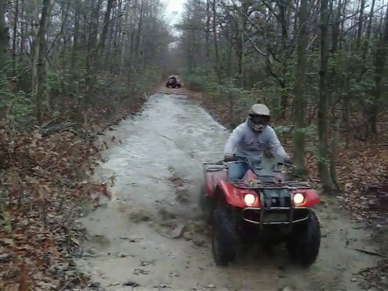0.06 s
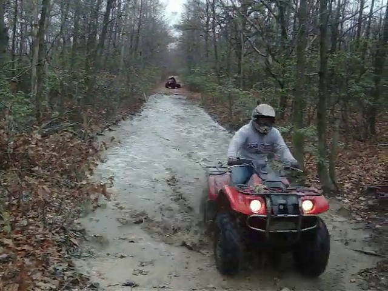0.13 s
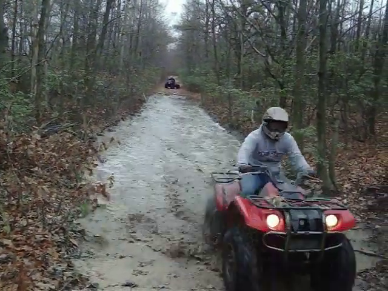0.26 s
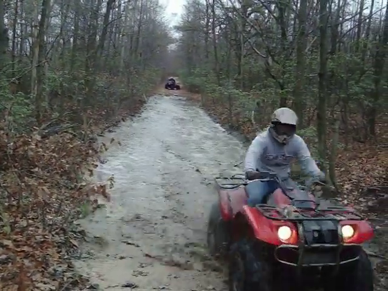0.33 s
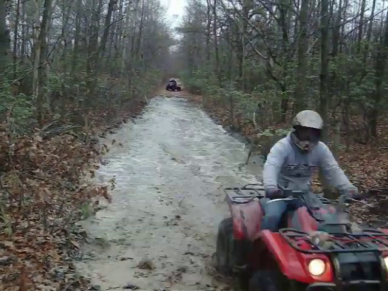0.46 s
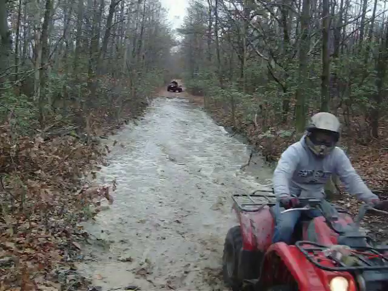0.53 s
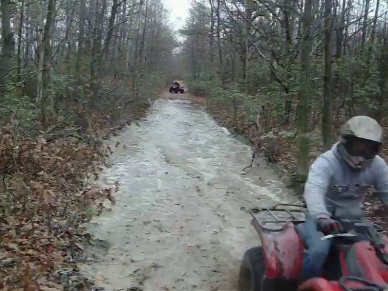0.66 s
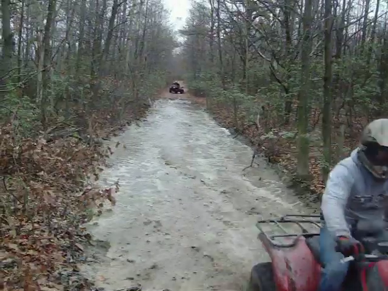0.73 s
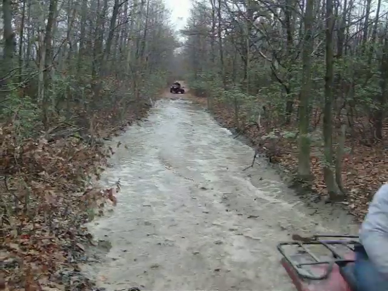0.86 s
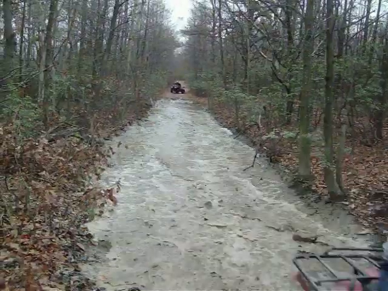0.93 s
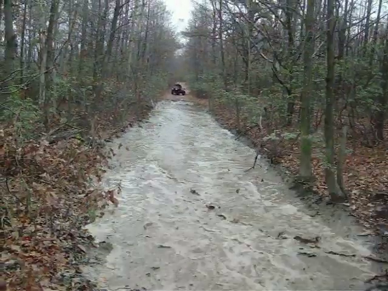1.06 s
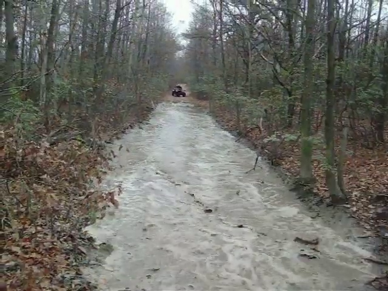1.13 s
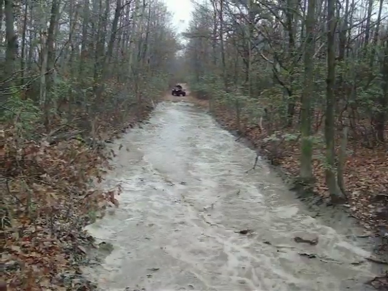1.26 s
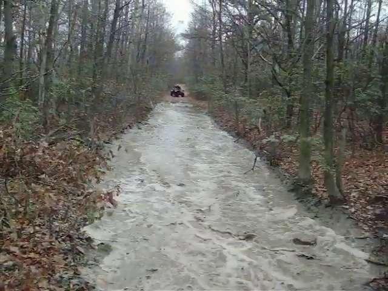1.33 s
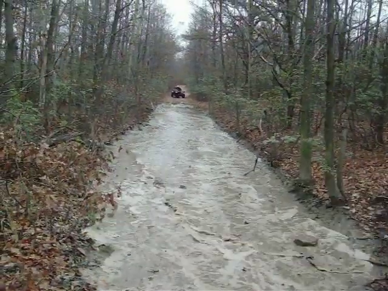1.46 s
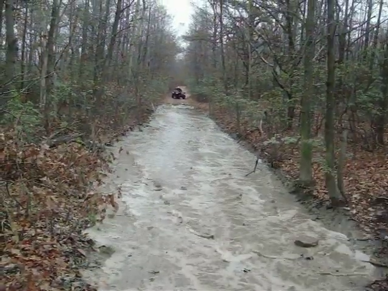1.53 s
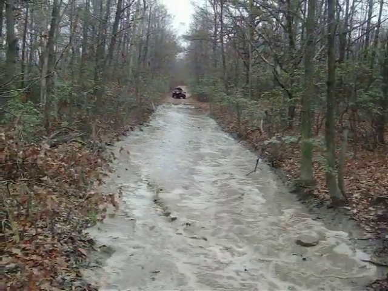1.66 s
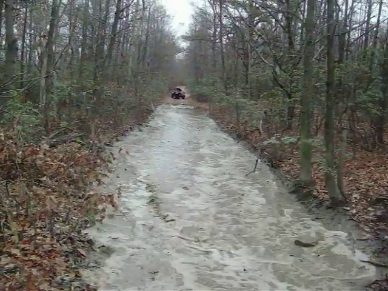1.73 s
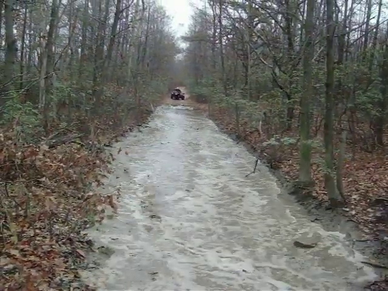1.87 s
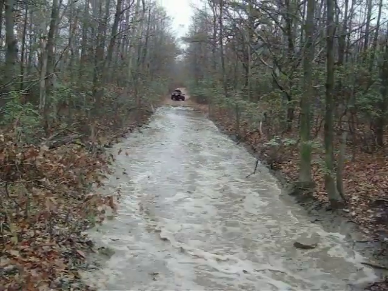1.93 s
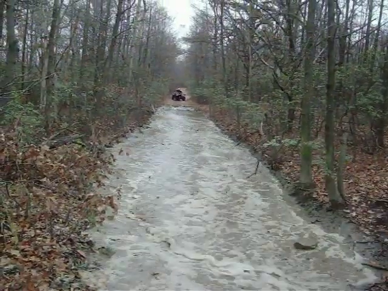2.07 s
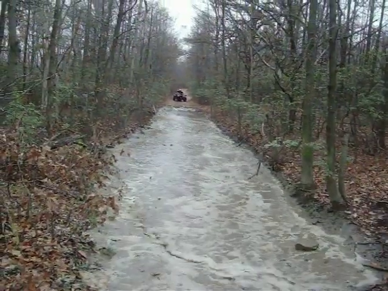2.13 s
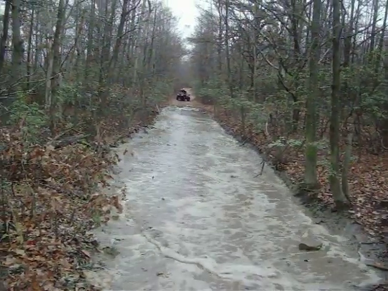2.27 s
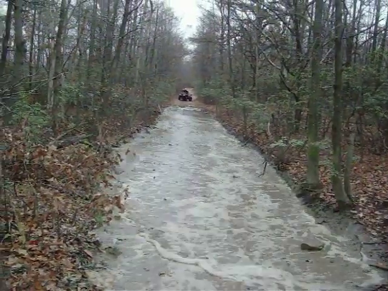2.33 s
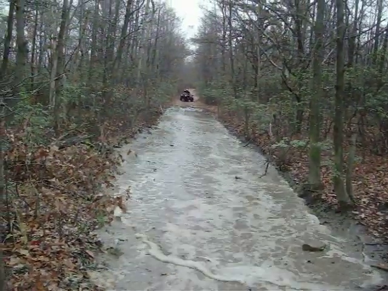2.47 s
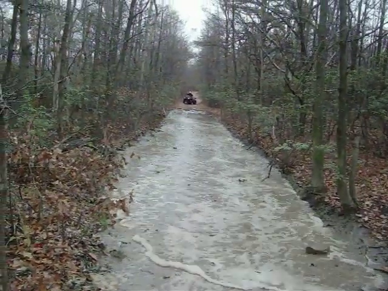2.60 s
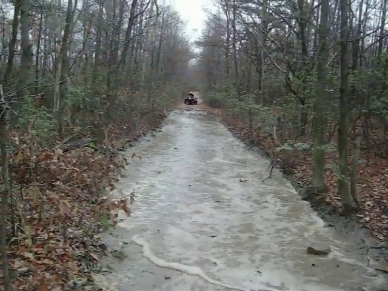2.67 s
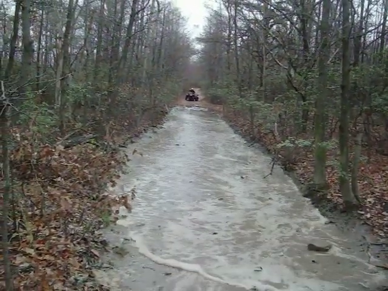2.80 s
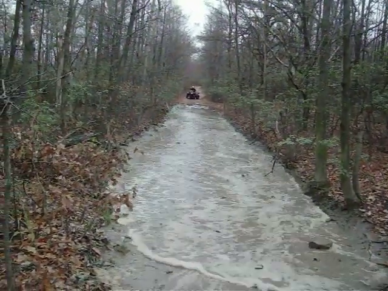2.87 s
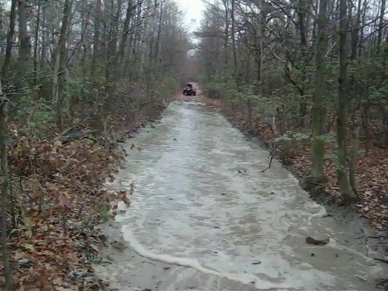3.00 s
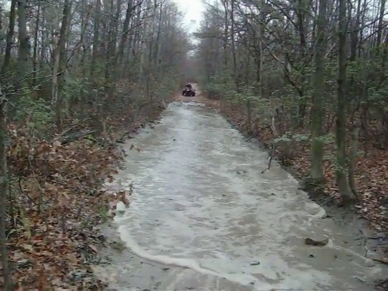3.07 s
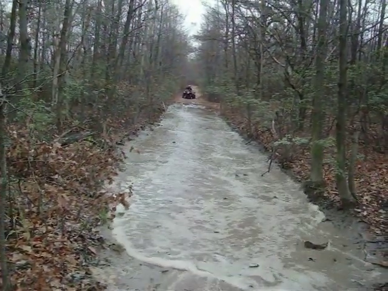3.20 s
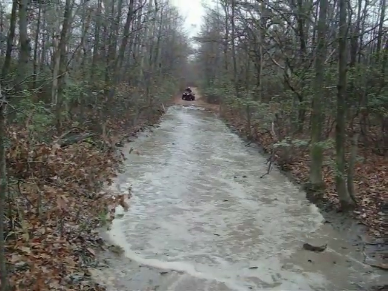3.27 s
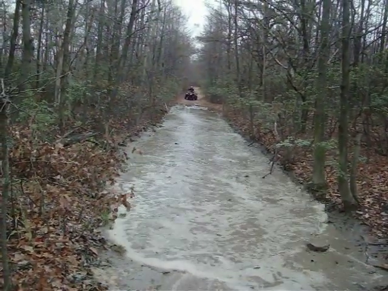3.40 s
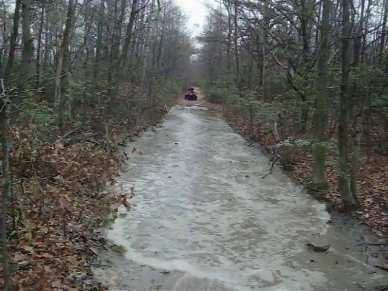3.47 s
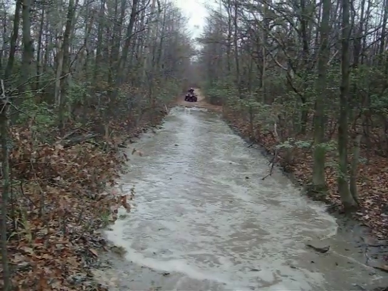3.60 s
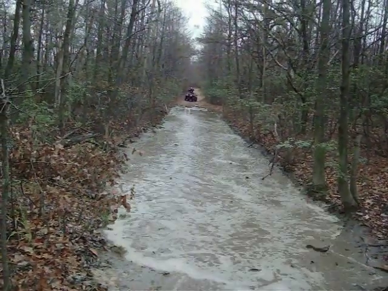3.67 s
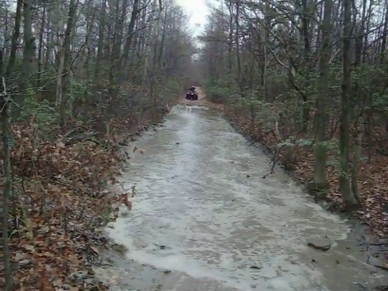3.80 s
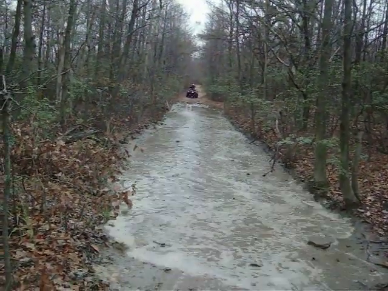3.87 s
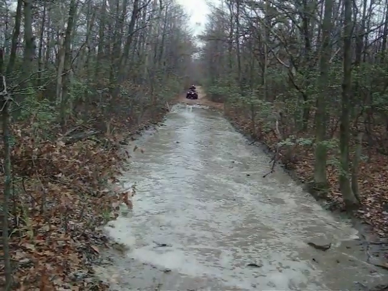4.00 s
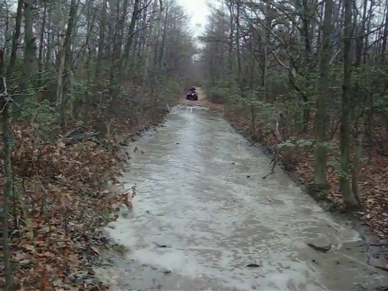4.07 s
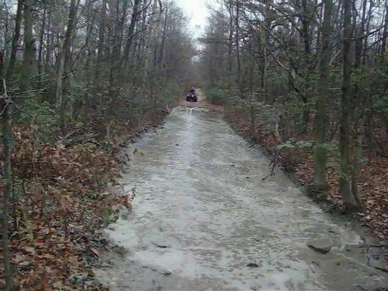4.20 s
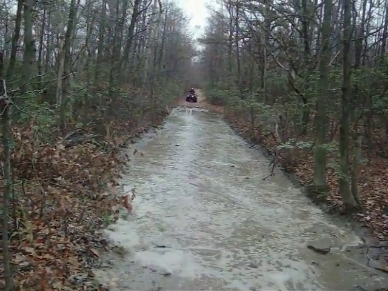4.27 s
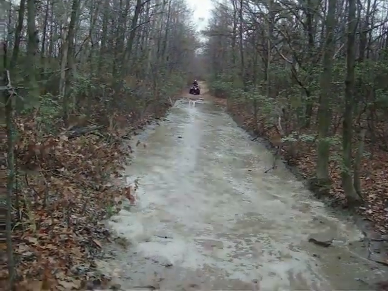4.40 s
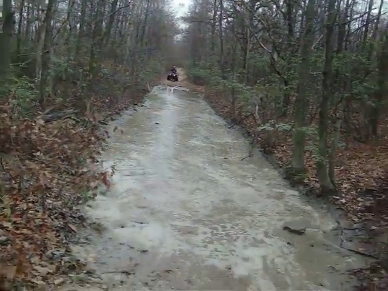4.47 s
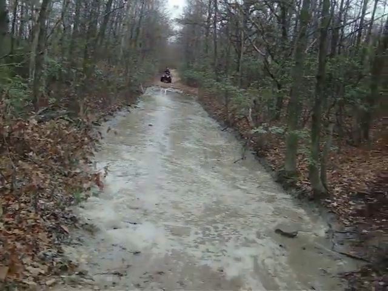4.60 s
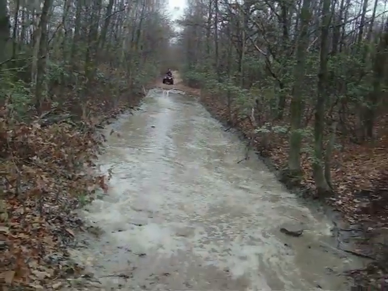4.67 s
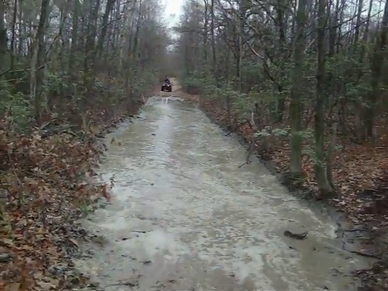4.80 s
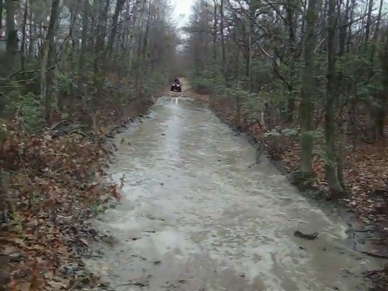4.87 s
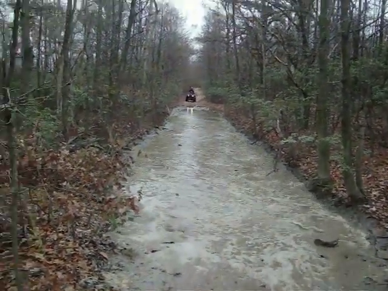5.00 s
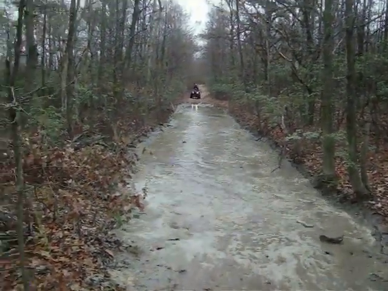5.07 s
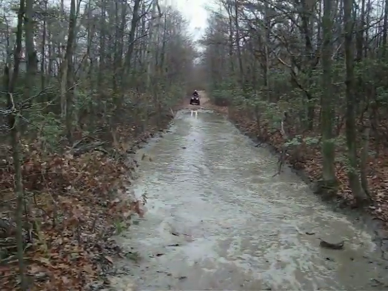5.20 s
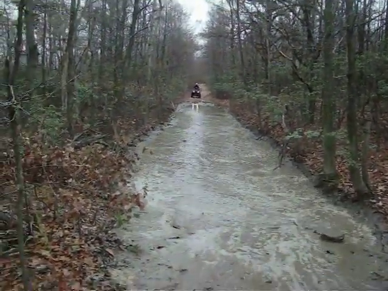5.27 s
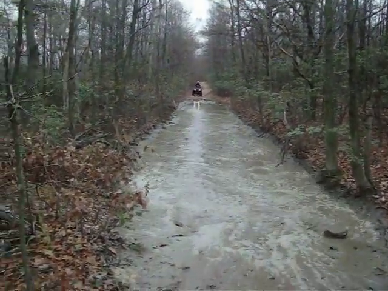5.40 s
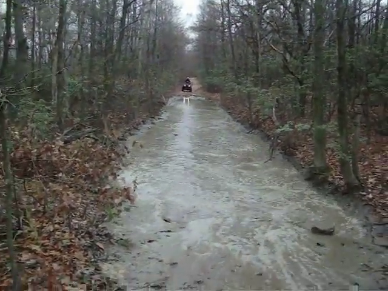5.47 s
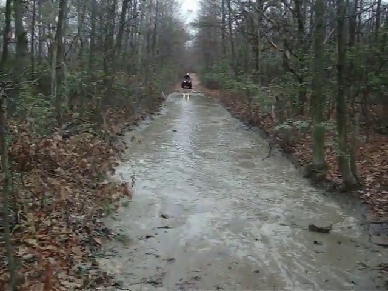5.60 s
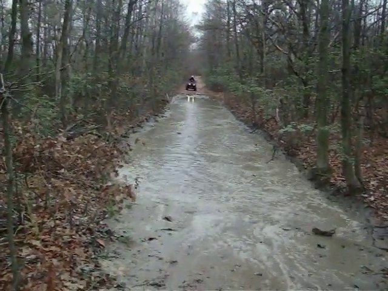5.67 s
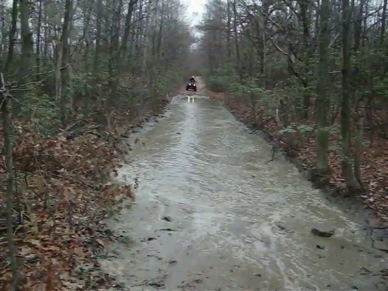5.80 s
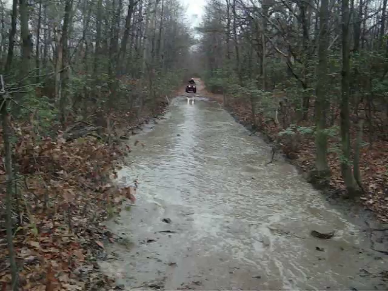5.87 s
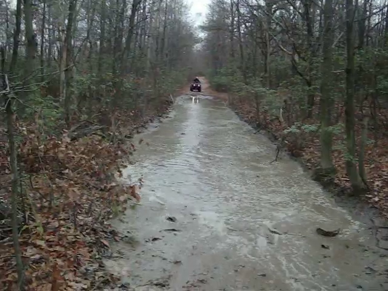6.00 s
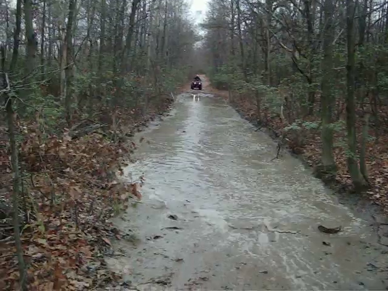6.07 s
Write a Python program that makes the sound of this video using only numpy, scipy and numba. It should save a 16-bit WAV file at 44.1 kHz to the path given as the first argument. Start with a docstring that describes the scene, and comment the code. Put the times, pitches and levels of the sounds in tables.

```python
"""On a flooded woodland track, a one-cylinder quad bike climbs out, passes close by, slows and idles.
Each firing sends a puff of gas down the exhaust, which thumps, barks and roars; valves, chain and
spray clatter along. A far engine hums behind it. The hand on the recorder rustles and taps, and each
hard tap makes the automatic gain (a self-adjusting volume) drop and creep back."""
import sys
import numpy as np
from scipy import signal
from scipy.fft import rfft, irfft, next_fast_len
from scipy.io import wavfile
from scipy.ndimage import uniform_filter1d
from numba import njit

SR = 44100
rng = np.random.default_rng(int(sys.argv[2]) if len(sys.argv) > 2 else 0)


def log_audio(samples):
    """Write samples as a 16-bit WAV file to the path given in sys.argv[1]."""
    # one column per channel
    frames = np.atleast_2d(samples).T
    # limit to full scale, then quantise
    limited = np.clip(frames, -1, 1)
    pcm = np.round(limited * 32767).astype(np.int16)
    wavfile.write(sys.argv[1], SR, pcm)


N = 270774
TIME = np.arange(N) / SR

# engine speed: t/s, firings per second/Hz
FIRING_RATE = [(0.0, 33.74), (0.43, 34.13), (0.93, 28.65), (1.02, 30.24), (1.63, 23.34), (2.1, 20.78),
               (2.75, 17.42), (3.15, 15.71), (3.32, 13.99), (3.57, 12.73), (4.5, 12.89), (4.55, 12.1),
               (5.01, 11.59), (5.24, 12.48), (6.2, 12.23)]
# firings that stand out, weak or strong: t/s, level/dB
ODD_FIRINGS = [(1.018, 0.5), (1.118, -1.5), (1.26, -6), (1.296, 1), (1.528, -3.5), (1.611, 4.5), (1.742, 4),
               (2.311, 5), (2.861, -2.5), (3.297, -7.5), (4.296, -12.5), (4.531, -11), (5.526, -3.5)]
# notes at which the pipe and silencer ring: f/Hz, relative level/dB, time to fade by 60 dB/s
PIPE_NOTES = [(66, 0, .126), (104, 13.7, .103), (134, 7, .141), (217, 15.9, .087), (218, 19.3, .058),
              (332, 8, .193), (378, 13.3, .068), (544, 17.9, .186), (582, 15.2, .112)]
# the tailpipe swings towards the microphone, then the idle softens: t/s, level/dB
TAILPIPE_LEVEL = [(1.9, -57), (2.4, -23), (2.95, -10), (4.0, -7.5), (5.3, -10.5), (6.1, -16)]
# parts of the hard-working engine: t/s, note level/dB, low bark level/dB, high bark level/dB, roar level/dB
PASS_LEVELS = [(0, -20, -27, -18, -14), (.5, -15.5, -25.5, -15.5, -13.5), (.9, -17.5, -14, -15.5, -14),
               (1.03, -26.5, -19.5, -20, -16.5), (1.15, -22, -17.5, -15, -18),
               (1.5, -27.5, -11.5, -13.5, -18), (1.9, -33.5, -10, -18, -28), (2.3, -20, -13, -24, -25),
               (2.6, -21.5, -19, -35, -30), (2.95, -36, -23, -31, -40), (3.2, -56.5, -49, -66, -60)]
# tones in the engine's note: multiple of the firing rate, relative level/dB
HARMONICS = [(1, -23), (2, -5), (3, 1.5), (4, 1), (5, -2), (6, -3), (7, -7.5), (8, -12), (9, -5.5),
             (10, -11.5)]
# pitch of the high bark: t/s, f/Hz
HIGH_BARK_PITCH = [(0, 571), (.92, 568), (1.02, 755), (1.5, 542), (1.8, 544), (2.25, 770), (2.7, 556)]
# the silencer drones once the bike has passed: t/s, level/dB
DRONE_LEVEL = [(1.05, -61), (1.15, -20), (1.6, -24.5), (2.9, -10), (3.3, -22.5), (3.7, -41.5)]
# tone colour of valves, chain and spray: f/Hz, relative level/dB
CLATTER_SPECTRUM = [(600, -35), (1000, -22), (1340, -7.5), (1940, -8), (2200, 0), (2770, 1.5), (3230, -7),
                    (4790, -9.5), (6500, -30.5)]
# fingertip taps: t/s, ring level/dB, crunch level/dB
TAPS = [(2.884, 13.5, -11.5), (3.346, -8, -18), (3.4895, 32, -4.5), (4.4229, -5, -17), (4.4617, 34, -3)]
# rubs near the microphone: start t/s, length/s, level/dB, lowest f/Hz, highest f/Hz
RUSTLES = [(3.014, 0.12, -26.5, 1190, 4900), (3.168, 0.027, -26, 1470, 4500),
           (3.35, 0.076, -35.5, 1200, 4930), (3.447, 0.19, -29.5, 1500, 5500),
           (4.433, 0.032, -20, 1180, 4640), (4.641, 0.064, -24, 2100, 3180),
           (5.03, 0.066, -25.5, 1300, 5000), (5.348, 0.063, -27, 2090, 3120),
           (5.532, 0.07, -24, 1910, 3040), (5.724, 0.15, -22.5, 1500, 4260), (5.855, 0.11, -22, 1990, 4270),
           (5.954, 0.16, -27, 1270, 3840)]
# tone colour of the hum between thumps: f/Hz, relative level/dB
HUM_SPECTRUM = [(35, -30.5), (60, -10.5), (97, -12.5), (145, -13.5), (230, -11.5), (425, -12), (525, -10.5),
                (661, -11.5), (1320, -22.5), (1700, -26.5), (3070, -35.5), (3720, -35.5), (6500, -50)]
# loudness of the hum before its swells: t/s, level/dB
HUM_LEVEL = [(1.0, -39.5), (2.0, -29.5), (2.8, -29.5), (3.5, -22.5), (5.0, -21.5), (6.1, -29.5)]


def firing_count():
    """How many times the engine has fired so far; it rises smoothly between firings."""
    count = np.cumsum(curves(FIRING_RATE)[0]) / SR
    return count - count[int(.0255 * SR)]   # the first firing is at .0255 s


def firings(spread_db):
    """One click each time the fuel burns, each with its own strength."""
    when = np.flatnonzero(np.diff(np.floor(firing_count())))
    db = spread_db * rng.standard_normal(len(when))
    for t, odd_db in ODD_FIRINGS:
        db[np.argmin(abs(when - t * SR))] = odd_db
    clicks = np.zeros(N)
    clicks[when] = amp(db)
    return clicks


def gust(clicks, delay_s, rise_s, fall_s):
    """The rush of gas after each firing: a quick rise to about 1, then a slower fall."""
    t = np.arange(int(6 * fall_s * SR)) / SR
    shape = (1 - np.exp(-t / rise_s)) * np.exp(-t / fall_s)
    return np.maximum(signal.fftconvolve(delay(clicks, delay_s), shape / shape.max())[:N], 0)


def tailpipe(clicks, puff_s=.00427, ground_echo_s=.00414):
    """Each puff rings the pipe and echoes off the ground; gas noise knocks in the silencer."""
    puffs = signal.fftconvolve(clicks, np.hanning(int(puff_s * SR)))[:N]
    # neighbouring notes swing in opposite directions
    pipe = sum((-1) ** k * amp(db) * ring(puffs, hz, fade) for k, (hz, db, fade) in enumerate(PIPE_NOTES))
    pipe = pipe + delay(pipe, ground_echo_s)
    knock = gust(clicks, .005, .0028, .012) * band(rng.standard_normal(N), hz=567, width_hz=130)
    knock *= amp(-1.9 * (TIME - 3.04))   # fades 1.9 dB a second as the idle settles
    return amp(curves(TAILPIPE_LEVEL)[0]) * (pipe / np.std(pipe[N // 2:]) + knock)


def pulsing(clicks, rise_s, fall_s, alongside_s=.96):
    """A loudness wobble: once the bike draws alongside, its firings stand apart more and more."""
    depth = np.where(TIME < alongside_s, .12, .59 + .2 * (TIME - alongside_s))
    depth = np.clip(depth, 0, .9)
    return 1 - depth + 2 * depth * gust(clicks, .007, rise_s, fall_s)


def barks_and_roar(steady, uneven, low_db, high_db, roar_db):
    """Firings and rushing gas make two hollow barks and a broad roar."""
    bark_noise, roar_noise = rng.standard_normal((2, N))
    leaving_s = np.clip(TIME - 2.086, 0, .5)   # the low bark rises and widens as the bike leaves
    low = band(delay(steady, .008) + .032 * bark_noise, 299 + 160 * leaving_s, 68.5 + 300 * leaving_s)
    pops = delay(uneven, .005)
    rush = pulsing(uneven, rise_s=.001, fall_s=.009)
    high = band(pops + .04 * rush * bark_noise, curves(HIGH_BARK_PITCH)[0], width_hz=170)
    roar = band(pops + .07 * rush * roar_noise, hz=709, width_hz=480)
    return amp(low_db) * low + filtered(amp(high_db) * high + amp(roar_db) * roar, "high", 300)


def engine_note(level_db):
    """Pure, wavering tones at multiples of the firing rate blend into one deep note."""
    phase = 2 * np.pi * firing_count()
    note = sum(amp(db + 2.5 * drift(12)) * np.cos(k * phase + k * k) for k, db in HARMONICS)
    return amp(level_db) * unit_level(note)


def drone(clicks):
    """The firings keep one low note sounding in the silencer."""
    return amp(curves(DRONE_LEVEL)[0]) * band(delay(clicks, .008), hz=104, width_hz=28)


def clatter(clicks, roar_db, under_roar_db=11, idle_db=-42):
    """Valves, chain and spray: bright, pulsing noise that follows the roar and stays faint at idle."""
    noise = pulsing(clicks, rise_s=.0015, fall_s=.007) * coloured(CLATTER_SPECTRUM)
    noise *= amp(1.3 * drift(37))
    return (amp(roar_db - under_roar_db) + amp(idle_db)) * even_out(noise)


def taps(shell_hz=12000, shell_fade_s=.012, crunch_fade_s=.024):
    """A fingertip hits the recorder's shell: a very high ring with a short crunch below it."""
    hits, grit = np.zeros((2, N))
    for t, ring_db, crunch_db in TAPS:
        hits[int(t * SR)], grit[int(t * SR)] = amp(ring_db), amp(crunch_db)
    dying = signal.lfilter([1], [1, -amp(-60 / (crunch_fade_s * SR))], grit + 1e-18)
    crunch = filtered(rng.standard_normal(N), "band", [1200, 4040])
    shell = filtered(ring(hits, shell_hz, shell_fade_s), "high", 9000, order=6)
    return shell + dying * unit_level(crunch)


def rustles():
    """The hand rubs the recorder: short bursts of grainy noise with a hollow ring."""
    out = np.zeros(N)
    grains = rng.standard_normal(N) * amp(2 * drift(150))
    hollow = amp(-1.5) * band(grains, hz=1345, width_hz=260)
    for t, length_s, db, from_hz, to_hz in RUSTLES:
        start, size = int(t * SR), int(length_s * SR)
        span = slice(start, start + size)
        rub = unit_level(filtered(grains[span], "band", [from_hz, to_hz]))
        out[span] += amp(db) * signal.windows.tukey(size, .6) * (rub + hollow[span])
    return out


def hum(clicks):
    """The engine's body and a far bike hum, swelling after each firing, with a thin whine on top."""
    swell = 1 + 1.695 * gust(clicks, 0, .024, .035)
    body = swell * coloured(HUM_SPECTRUM) * amp(drift(25))
    whine = amp(-20.5) * band(rng.standard_normal(N), hz=3655, width_hz=10)
    return amp(curves(HUM_LEVEL)[0]) * (body + whine)


def amp(db):
    """Turn decibels into a number to multiply by."""
    return 10 ** (np.asarray(db) / 20)


def unit_level(x):
    """Scale a sound so its average level (rms) is 1."""
    return x / np.sqrt(np.mean(x ** 2) + 1e-20)


def even_out(x):
    """Hold the average level near 1 over every eighth of a second."""
    return x / np.sqrt(uniform_filter1d(x ** 2, size=SR // 8) + 1e-20)


def curves(rows):
    """Join a table's points with straight lines over time, one curve per value column."""
    t, *columns = np.transpose(rows)
    return [np.interp(TIME, t, column) for column in columns]


def delay(x, seconds):
    """Shift a sound later; its end wraps round to the start."""
    return np.roll(x, int(seconds * SR))


def drift(rate_hz):
    """A random wander of about 1 either way, turning rate_hz times a second."""
    knots = np.arange(0, N / SR + 1, 1 / rate_hz)
    return np.interp(TIME, knots, rng.standard_normal(4000)[:len(knots)])


def coloured(spectrum):
    """Noise at level 1 with the given tone colour."""
    hz, db = np.transpose(spectrum)
    size = next_fast_len(N)
    bins_hz = np.maximum(np.fft.rfftfreq(size, 1 / SR), 1)
    gains = amp(np.interp(np.log(bins_hz), np.log(hz), db))
    return unit_level(irfft(rfft(rng.standard_normal(size)) * gains, size)[:N])


def filtered(x, kind, hz, order=2):
    """Keep what lies above one frequency ("high") or between two ("band")."""
    return signal.sosfilt(signal.butter(order, hz, kind, fs=SR, output="sos"), x)


def ring(clicks, hz, fade_s):
    """Each click starts a pure tone that dies away by 60 dB in fade_s."""
    decay, step = amp(-60 / (fade_s * SR)), 2 * np.pi * hz / SR
    return signal.lfilter([0, np.sin(step)], [1, -2 * decay * np.cos(step), decay * decay], clicks + 1e-18)


@njit
def resonate(x, pull, decay):
    """A ringing filter whose pitch and width can move."""
    y = np.zeros(len(x))
    for i in range(2, len(x)):
        y[i] = x[i] - x[i - 2] + pull[i] * y[i - 1] - decay[i] * decay[i] * y[i - 2]
    return y


def band(x, hz, width_hz):
    """Bring out one pitch by ringing the sound twice, then even out its level."""
    decay = np.exp(-np.pi * width_hz / SR) * np.ones(N)
    pull = 2 * decay * np.cos(2 * np.pi * hz / SR)
    return even_out(resonate(resonate(x, pull, decay), pull, decay))


def scene():
    """All the sounds meet at one microphone."""
    steady, uneven = firings(spread_db=1), firings(spread_db=2.2)
    note_db, low_db, high_db, roar_db = curves(PASS_LEVELS)
    bike = tailpipe(steady) + barks_and_roar(steady, uneven, low_db, high_db, roar_db)
    bike += engine_note(note_db) + drone(steady) + clatter(uneven, roar_db)
    return (bike + hum(steady) + rustles() + taps())[None]


def record(dry):
    """Automatic gain drops on peaks and creeps back; treble is cut and the biggest peaks are flattened."""
    knee_db, release_db_per_s, attack_s, boost_db = 3.5, 32, .0022, 3
    treble_limit_hz, final_limit_hz, ceiling = 6200, 15800, .715
    release_db = release_db_per_s * TIME   # each peak is remembered, then slowly forgotten
    peak_db = np.maximum.accumulate(20 * np.log10(abs(dry[0]) + 1e-4) + release_db) - release_db
    wanted_db = -20 * np.log10(1 + amp(peak_db - knee_db))
    lag = np.exp(-1 / (attack_s * SR))
    gain_db = signal.lfilter([1 - lag], [1, -lag], wanted_db)
    circuit_hiss = amp(-49) * rng.standard_normal(N)
    treble_cut = signal.cheby2(18, 60, treble_limit_hz, fs=SR, output="sos")
    ducked = signal.sosfilt(treble_cut, dry) * amp(gain_db + boost_db)
    dull = signal.sosfilt(treble_cut, ducked + circuit_hiss)
    clipped = dull / (1 + (dull / ceiling) ** 30) ** (1 / 30)
    return signal.sosfilt(signal.cheby2(12, 70, final_limit_hz, fs=SR, output="sos"), clipped)


dry = scene()
out = record(dry)
log_audio(out)
```